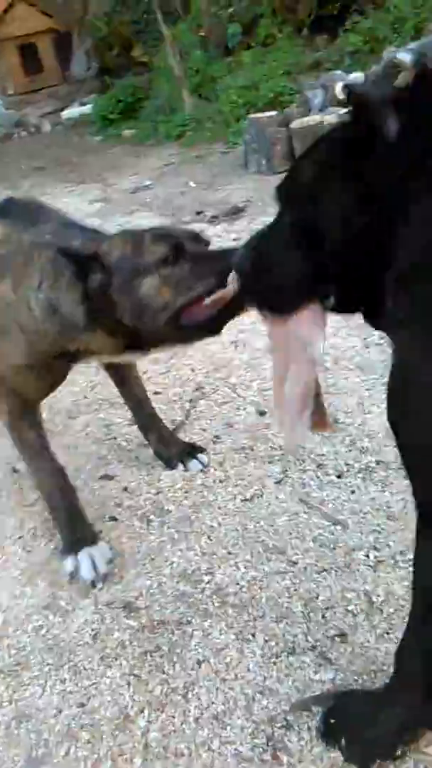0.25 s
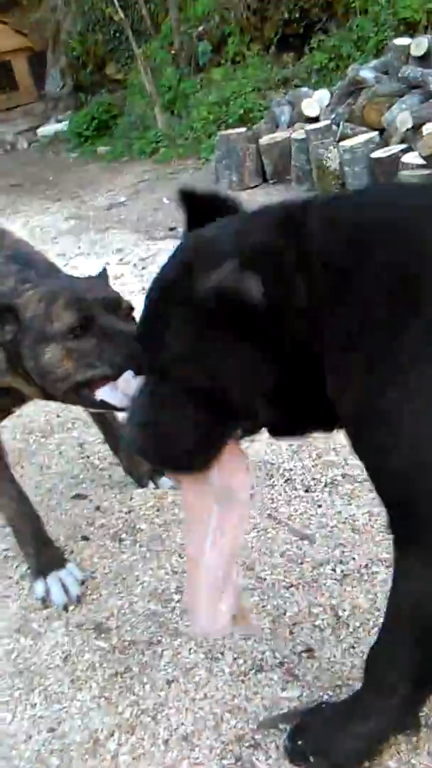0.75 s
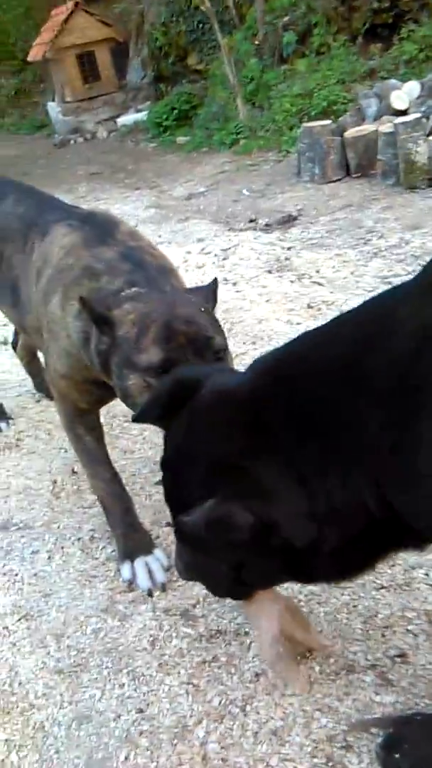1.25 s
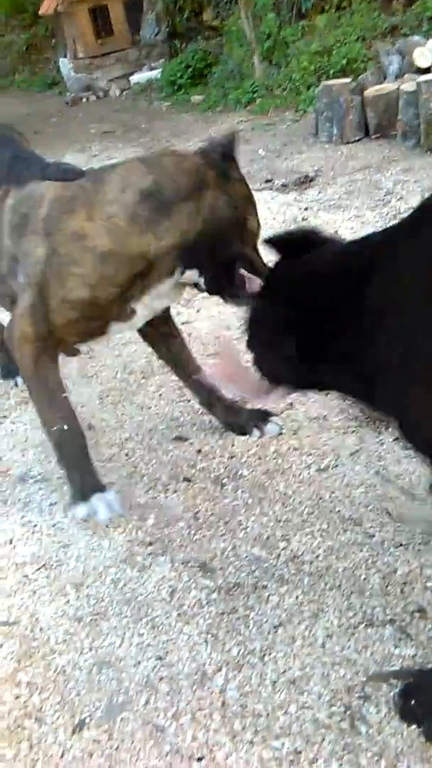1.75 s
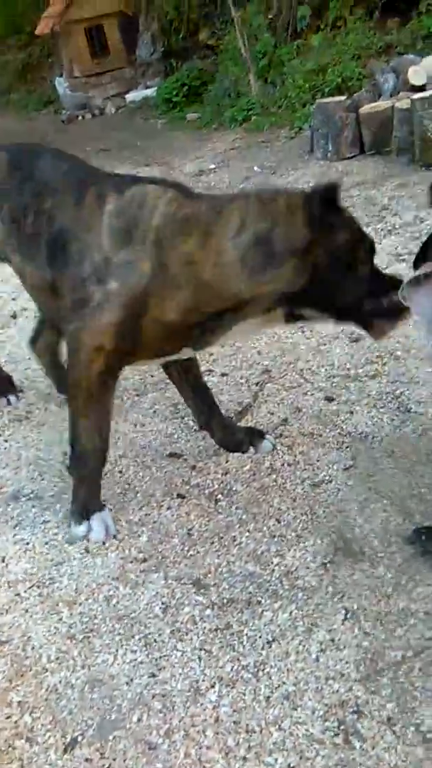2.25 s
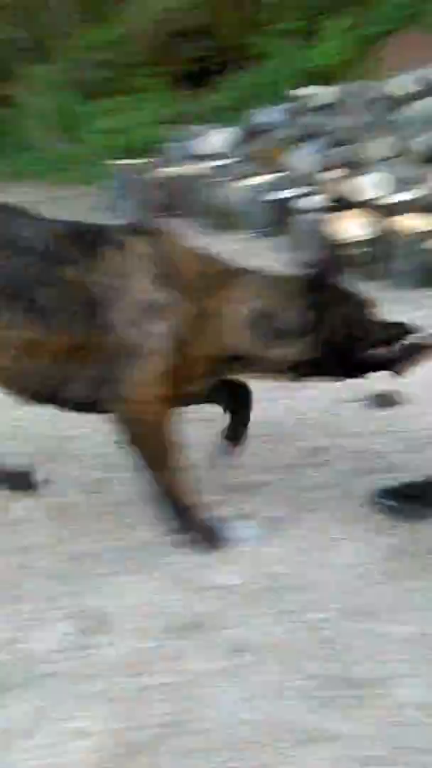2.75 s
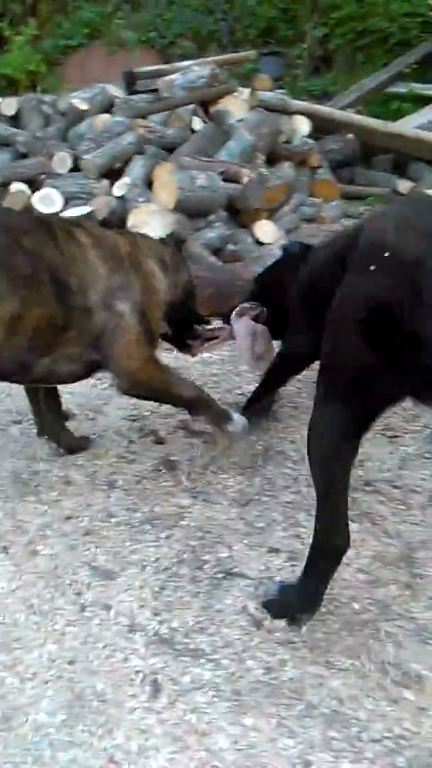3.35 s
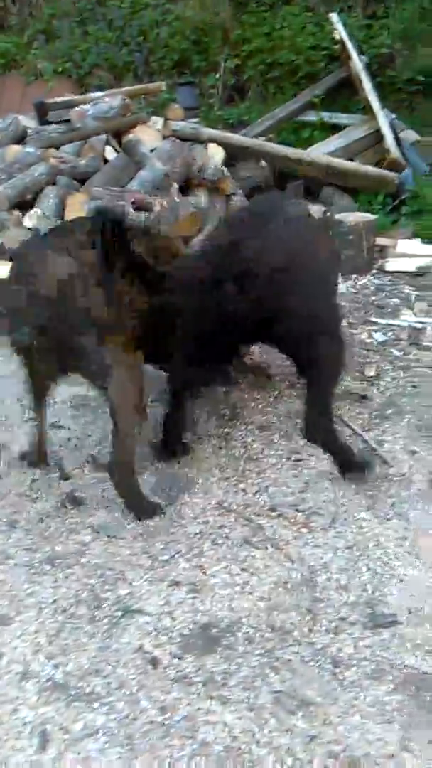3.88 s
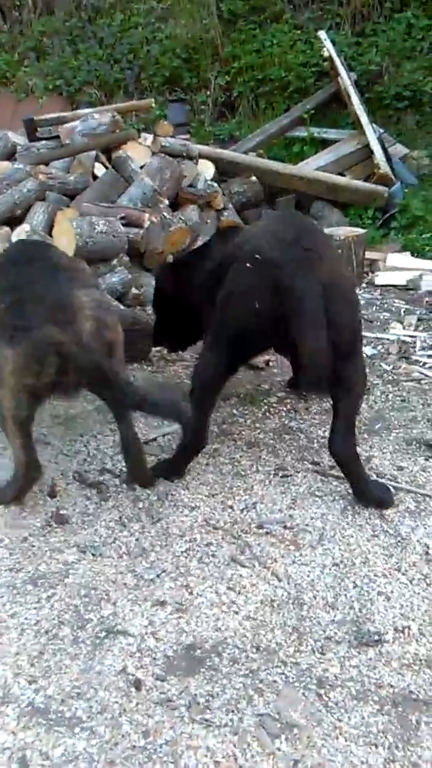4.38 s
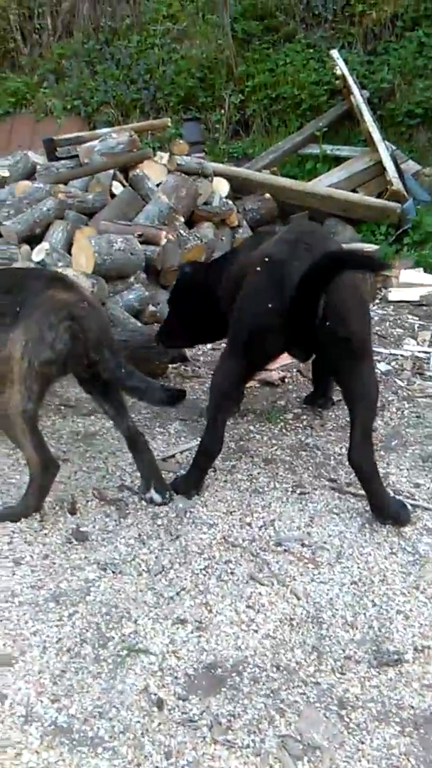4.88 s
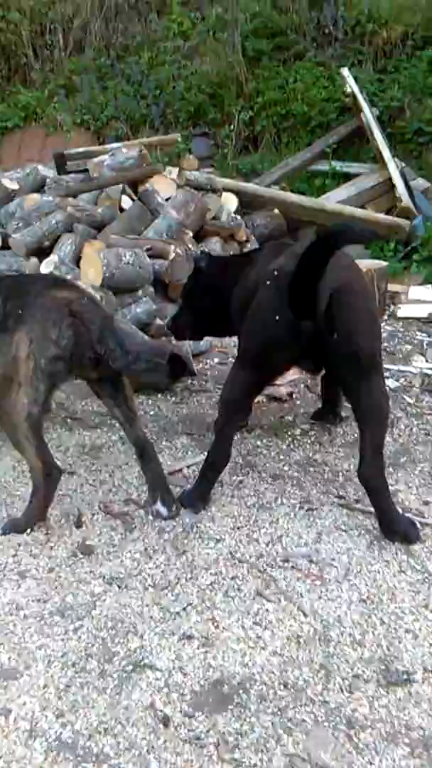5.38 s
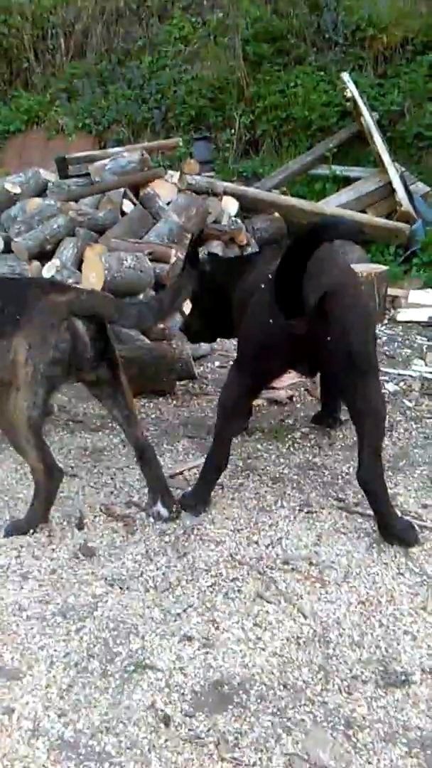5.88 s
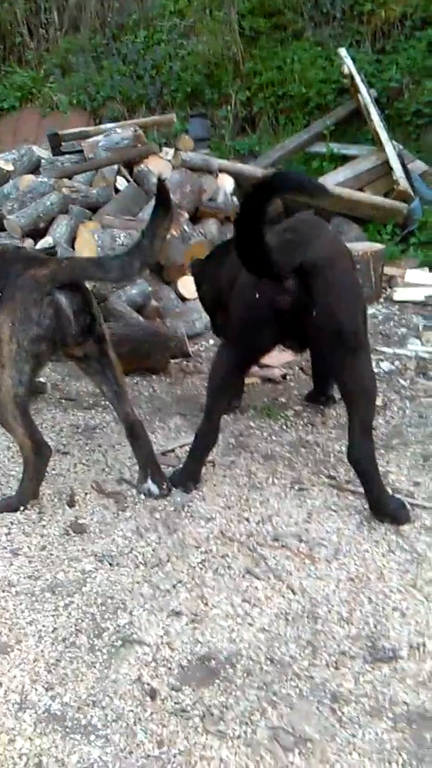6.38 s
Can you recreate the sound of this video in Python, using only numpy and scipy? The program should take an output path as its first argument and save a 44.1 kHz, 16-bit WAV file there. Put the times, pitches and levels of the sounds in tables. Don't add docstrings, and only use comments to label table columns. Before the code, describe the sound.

Outdoors in a gravel yard, close small microphone. Soft distant wash and high cricket chirps come first, with very faint dog hums and light paw scuffs. Stones clack around two seconds, then low chesty growls rumble and burst into rough, open-mouthed snarls with raspy squeaks and gravel scraping. Two short grumbles end it, leaving crickets and quiet air.

```python
import sys
import numpy as np
from scipy import signal
from scipy.fft import rfft, irfft
from scipy.io import wavfile
from scipy.ndimage import uniform_filter1d

SR = 44100
rng = np.random.default_rng(int(sys.argv[2]) if len(sys.argv) > 2 else 0)


def dump(signal):
    limited = np.clip(np.atleast_2d(signal).T, -1, 1)
    pcm = np.round(limited * 32767).astype(np.int16)
    wavfile.write(sys.argv[1], SR, pcm)


def volts_from_db(level):
    exponent = np.asarray(level, float) / 20
    return 10 ** exponent


N = 292262
STRIKE_DB = -2.5


def evened(x):
    return x / np.sqrt(np.mean(x ** 2) + 1e-20)


def add(mix, s, sound):
    part = mix[round(s * SR):][:len(sound)]
    part += sound[:len(part)]


def unroll(rows):
    s, *columns = np.transpose(rows)
    t = np.arange(s[0], s[-1], 1 / SR)
    return s[0], [np.interp(t, s, c) for c in columns]


def filtered(x, order, hz, kind):
    return signal.lfilter(*signal.butter(order, hz, kind, fs=SR), x)


def wander(size, hz):
    noise = rng.standard_normal(size + SR // 4)
    return evened(filtered(noise, 2, hz, "low")[SR // 4:])


def resonate(x, hz, width):
    turn = np.exp(2j * np.pi * np.cumsum(hz * np.ones(len(x))) / SR)
    r = np.exp(-np.pi * width / SR)
    return 2 * (turn * signal.lfilter([(1 - r) ** 2], [1, -2 * r, r * r], x / turn)).real


def coloured(x, points):
    hz, db = np.transpose(points)
    f = np.fft.rfftfreq(N, 1 / SR)
    gain = volts_from_db(np.interp(np.log(f + 1), np.log(hz), db))
    return evened(irfft(rfft(x) * gain, N))


def dogs():
    # t/s, level/dB, jaw opening (0 shut, 1 wide, at times beyond either)
    rumbles = [
        [(2.49, -63, .2), (2.504, -51, 0.43), (2.56, -42, 0), (2.63, -43, 0.32), (2.784, -45.5, 0),
         (2.86, -53.5, 0), (2.88, -44, 0)],
        [(2.88, -48.5, 0.13), (2.894, -51.5, 0.38), (2.946, -43.5, 0.01), (2.982, -43.5, 0.57),
         (3.038, -41, 0.16), (3.1, -40, 0.3), (3.2, -43.5, 0.14), (3.29, -47.5, 0.19), (3.34, -68, 0.7)],
    ]
    snarls = [
        [(3.5, -56, .1), (3.546, -52, -0.65), (3.575, -42.5, 0.57), (3.602, -32.5, 0.75), (3.642, -33, 0.47),
         (3.71, -38.5, 0.7), (3.74, -41.5, 0.65), (3.756, -43.5, 0.68), (3.8, -52, -0.17)],
        [(3.8, -51, 0.197), (3.816, -48.5, 0.69), (3.846, -36.5, 0.43), (3.904, -38.5, 0.63),
         (3.93, -41.5, 0.5), (3.984, -46, 0.65), (4.025, -66, 0.71)],
        [(4.03, -68, 0.21), (4.039, -50, 1), (4.042, -43, 0.99), (4.058, -36, 0.62), (4.08, -38.5, 0.6),
         (4.1, -36.5, 0.72), (4.125, -36, 0.24)],
        [(4.128, -32.5, 0.89), (4.15, -38, 0.98), (4.175, -37, 0.78), (4.23, -36, 0.72), (4.3, -37.5, 0.59),
         (4.314, -39.5, 1.04), (4.392, -42.5, 0.65), (4.415, -53, 0.24), (4.45, -62, 0.01)],
    ]
    grumbles = [
        [(4.46, -47.5, 0.38), (4.5, -47.5, 0.67), (4.512, -51, 0.72), (4.57, -49.5, 0.011), (4.6, -61, 0.39)],
        [(4.64, -49, 0.47), (4.66, -44, 0.0105), (4.7, -51, 0.27), (4.728, -44.5, 0.206), (4.806, -49, 0.2648),
         (4.84, -65, 0.67)],
    ]
    # chest f/Hz, mouth f/Hz at start and end, lip f/Hz at start and end
    tracts = [(150, 705, 690, 3100, 1700), (181, 526, 582, 1450, 2450), (256, 526, 795, 2097, 2068),
              (180, 645, 660, 1950, 2260), (206.6, 730, 657, 2080, 2060), (209, 687, 677, 1906, 2290),
              (198, 550, 450, 2270, 2160), (161, 570, 556, 2100, 2110)]
    bends = [1.01, 0.395, 1.74, 1, 1.8, 1.12, 1.2, 0.91]
    lip_rings = [-37, -21, -33, -29, -25, -21, -32, -23]
    pipe_rings = [-8.5, -7, -0.5, -4.5, -8, -4.5, -11, -9]
    # pulse f/Hz, jitter [0-1], noise share [0-1]
    folds = [(72.8, .16, 0.09), (54, .25, 0.27), (82.86, .15, 0.65), (74, 0.1, 0.38), (74, 0, 0.7),
             (95.95, .3, 0.62), (60.1, 0.4, 0.04), (128.8, .12, 0.08)]
    # flutter f/Hz, depth/dB, start [turns]
    flaps = [(24.6, 1.5, 0.096), (26.07, 4.5, 0.4), (42.5, -5.5, 0.12), (37.3, 0, 0.13), (31.5, 8, 0.1),
             (47.16, 8.5, 0.17), (38.9, 17.5, 0.15), (16.8, 14, 0.99)]
    # gape level/dB, nose level/dB, rasp level/dB over the chest at start and end
    rings = [(-3.5, -5, -35, -27), (-2.5, -6.5, -42, -20), (-3.5, -29, -30, -13.5), (5, -16, -15.5, -20),
             (-1, -7.5, -28, -35), (4.5, -17.5, -11.5, -18), (-1, -11, -18, -6), (11, -8, -8, -17)]
    # t/s, peak level/dB, f/Hz, t60/s
    slaps = [(3.597, -20, 653, 0.044), (3.61, -25, 640, 0.05), (3.625, -24.5, 565, 0.071),
             (3.643, -27.5, 565, 0.058), (3.662, -28, 700, 0.061), (3.715, -32.5, 674, 0.046),
             (3.851, -43, 657, 0.043), (3.883, -32, 581, 0.039), (4.041, -27, 752, 0.045),
             (4.061, -28, 635, 0.064), (4.079, -24.5, 725, 0.05), (4.133, -20, 476, 0.044),
             (4.147, -18.5, 506, 0.05), (4.157, -18, 774, 0.062), (4.207, -30, 781, 0.056),
             (4.239, -26.5, 697, 0.05), (4.262, -31, 700, 0.043), (4.311, -22, 732, 0.043),
             (4.335, -25, 724, 0.042), (4.358, -27, 710, 0.042), (4.373, -35, 715, 0.061)]
    # t/s, peak level/dB, f/Hz, t60/s
    thumps = [
        (2.552, -38, 151, 0.04),
        (2.936, -34, 102.6, 0.043),
        (3.127, -40, 164, 0.036),
        (3.205, -35, 190, 0.04),
        (3.716, -28.5, 220, 0.04),
        (3.843, -32, 134, 0.04),
    ]
    # t/s,
    # length/s, peak level/dB, f/Hz
    squeaks = [(2.992, 0.021, -54, 1900), (3.154, 0.028, -53.5, 2170), (3.571, 0.047, -43.5, 710),
               (3.96, 0.042, -48.5, 900), (4.146, 0.024, -49, 450), (4.069, .025, -52, 3614),
               (4.087, .016, -55, 2100), (4.093, 0.013, -59, 3620), (4.135, 0.019, -44.5, 2060),
               (4.16, 0.06, -51, 2620), (4.162, 0.048, -46, 1946), (4.165, 0.052, -46.5, 3510),
               (4.166, .035, -49, 4290), (4.197, 0.028, -38.5, 2015), (4.226, 0.025, -39.5, 2570),
               (4.225, 0.025, -53, 1900), (4.272, 0.019, -42, 2770), (4.32, 0.019, -46, 2700),
               (4.344, 0.041, -48, 3450), (4.363, 0.067, -50, 2250), (4.373, 0.036, -51, 2740),
               (4.165, .13, -38.5, 415), (4.05, 0.067, -44, 470), (4.373, 0.048, -52, 1060),
               (4.19, 0.048, -46, 1120)]
    # t/s, length/s, peak level/dB, f/Hz
    hums = [
        (0.034, 0.17, -63.5, 750),
        (0.315, 0.19, -65.5, 684),
        (0.596, 0.17, -61, 695),
        (1.608, 0.087, -63, 867),
    ]
    mix = np.zeros(N)
    for row in zip(rumbles + snarls + grumbles, tracts, bends, lip_rings, pipe_rings, folds, flaps, rings):
        add(mix, *growl(*row))
    for s, peak_db, *ring in slaps + thumps:
        add(mix, s, thud(peak_db + STRIKE_DB, *ring))
    for row in squeaks:
        add(mix, *squeak(*row))
    for row in hums:
        add(mix, *hum(*row))
    return mix


def growl(rows, tract, bend, lip_db, pipe_db, folds, flaps, rings):
    # multiple of chest Hz, width/Hz, level/dB
    chest_modes = [(.58, 82, -2.5), (1.01, 120, -2), (1.42, 115.3, -6.5)]
    # multiple of mouth Hz, width/Hz, level/dB
    mouth_modes = [(1.023, 120, 0.1)]
    # multiple of mouth Hz, width/Hz, level/dB
    gape_modes = [(.62, 150, 5), (.81, 88, 6), (1.11, 90, 7.5)]
    # f/Hz, width/Hz, level/dB
    nose_modes = [(965, 130, 3.5), (1110, 310, 3), (1240, 36, 6)]
    # multiple of lip Hz, width/Hz, level/dB
    rasp_modes = [(.8, 350, -5.5), (1.005, 250, 4), (1.27, 316, 3.5), (1.67, 497, -1.5), (2.03, 453, 0.5)]
    edge_db = -13.5
    fold_hz, jitter, noise_share = folds
    flutter_hz, flutter_db, flutter_start = flaps
    gape_db, nose_db, *rasp_ends_db = rings

    s, (chest_db, jaw) = unroll(rows)
    size = len(chest_db)
    mouth_db, rasp_db, chest_hz, mouth_hz, lip_hz = throat(chest_db, jaw, tract, bend, *rasp_ends_db)

    turns = np.cumsum(fold_hz * np.exp(jitter * wander(size, 44.95))) / SR
    hard, bump = snaps(s, size)
    pulses = np.diff(np.floor(turns), prepend=0) * volts_from_db(9 * jitter * wander(size, 60))
    slaps = evened(hard + pulses)
    puffs = evened((0.63 + np.exp(-(turns % 1) / 0.5)) * rng.standard_normal(size))
    flap_turns = flutter_start + np.cumsum(flutter_hz * np.exp(0.023 * wander(size, 5.7))) / SR
    flutter = uniform_filter1d(volts_from_db(-flutter_db * (flap_turns % 1)), size=200) * bump
    voiced = flutter * (np.sqrt(1 - noise_share) * slaps + np.sqrt(noise_share) * puffs)

    chest = cavity(voiced, chest_hz, chest_modes, 2.05)
    mouth = cavity(voiced, mouth_hz, mouth_modes, 1.3)
    mouth = mouth + volts_from_db(gape_db) * cavity(voiced, mouth_hz, gape_modes, 4.6)
    mouth = mouth + volts_from_db(edge_db) * evened(filtered(voiced, 2, [300, 1250], "band"))
    mouth = evened(mouth) + volts_from_db(nose_db) * cavity(voiced, 1, nose_modes, 2.4)
    rasp = cavity(flutter * (.45 * slaps + puffs), lip_hz, rasp_modes, 4.5)
    lips = evened(resonate(voiced, lip_hz, 116))
    pipe = evened(resonate(voiced, 1.052 * chest_hz, 38.0))
    sound = chest + volts_from_db(mouth_db) * mouth + volts_from_db(rasp_db) * rasp + volts_from_db(lip_db) * lips + volts_from_db(pipe_db) * pipe
    sound = filtered(sound, 2, 62, "high")
    return s, volts_from_db(chest_db) * sound * signal.windows.tukey(size, .05)


def throat(effort_db, jaw, tract, bend, rasp_from_db, rasp_to_db):
    shut_db, open_db = -21, 29
    chest_sag, rasp_lag = 0.012, 0.42
    rasp_build_s = 0.033
    chest_hz, mouth_from, mouth_to, lip_from, lip_to = tract
    size = len(jaw)
    slack = effort_db.max() - effort_db
    along = np.linspace(0, 1, size) ** bend
    late_db = 20 * np.maximum(1 - np.arange(size) / SR / rasp_build_s, 0)
    mouth_db = shut_db + open_db * jaw
    rasp_db = rasp_from_db + (rasp_to_db - rasp_from_db) * along + rasp_lag * slack - late_db
    mouth_hz = mouth_from + (mouth_to - mouth_from) * along
    lip_hz = lip_from + (lip_to - lip_from) * along
    return mouth_db, rasp_db, chest_hz * np.exp(-chest_sag * slack), mouth_hz, lip_hz


def snaps(s, size):
    # t/s, boost level/dB; above 0 a slap and a bump, below 0 only a short dip
    hard_flaps = [(2.551, -6), (2.62, 2), (2.715, -3), (2.937, 2), (2.975, 0), (3.009, 8), (3.041, 9),
                  (3.084, 7.5), (3.127, 13), (3.165, 15), (3.206, 16), (3.245, 10), (3.28, 3),
                  (3.597, -0.5), (3.716, 3), (3.85, 3.5), (3.884, 7), (4.042, 7.5), (4.134, -0.5),
                  (4.311, 2), (4.335, 5.5), (4.36, 7.5)]
    hits = np.zeros(N)
    for at, boost_db in hard_flaps:
        hits[round(at * SR)] = volts_from_db(boost_db) - 1
    hits = hits[round(s * SR):][:size]
    decay = np.exp(-1 / (0.016 * SR))
    return hits > 0, 1 + signal.lfilter([1], [1, -decay], hits)


def cavity(x, hz, modes, restless):
    rings = 0
    for k, (multiple, width, db) in enumerate(modes):
        drift = 1 + restless / 150 * wander(len(x), 7.0)
        swell_db = restless * wander(len(x), 10.0)
        rings = rings + (-1) ** k * volts_from_db(db + swell_db) * resonate(x, multiple * hz * drift, width)
    held = uniform_filter1d(uniform_filter1d(rings ** 2, size=2200), size=2200)
    return rings / np.sqrt(held + 1e-20)


def squeak(s, length, peak_db, hz):
    size = round(length * SR)
    t = np.arange(size) / SR
    ruffle = 1 + 0.29 * np.cos(2 * np.pi * 130 * t)
    breath = evened(resonate(rng.standard_normal(SR // 4)[:size], hz, 380))
    tone = np.sin(2 * np.pi * hz * t) + breath
    return s, volts_from_db(peak_db) * evened(tone * ruffle) * signal.windows.tukey(size, .7)


def hum(s, length, peak_db, hz):
    size = round(length * SR)
    tone = evened(resonate(rng.standard_normal(SR)[:size], hz, 87))
    return s, volts_from_db(peak_db) * tone * signal.windows.tukey(size, .8)


def paws():
    # t/s, peak level/dB, f/Hz
    stones = [(1.8078, -48, 7920), (2.046, -43, 7330), (2.119, -41, 6900), (2.159, -37, 6340),
              (2.1644, -39, 9500), (2.166, -37, 6140), (2.7152, -46, 7180), (2.831, -43, 6980),
              (3.362, -41.5, 7750), (3.4196, -37, 7420), (3.4554, -46, 7300), (3.5678, -41, 7700),
              (3.8435, -35, 6800), (3.916, -39, 7430), (4.104, -34, 7400), (4.325, -38, 6700),
              (4.351, -35.5, 7450), (4.562, -45, 5600), (6.331, -43, 6230), (6.4453, -43.5, 8400)]
    # t/s, peak level/dB, f/Hz, t60/s
    landings = [
        (2.019, -50, 129, 0.047),
        (2.052, -43.5, 150, 0.033),
        (2.091, -45.5, 130, 0.03),
        (2.34, -48, 139, 0.04653),
        (4.464, -39.5, 275, 0.042),
        (4.494, -41, 132, 0.066),
    ]
    # t/s, peak level/dB, f/Hz, t60/s
    knocks = [(2.013, -47, 885, 0.035), (2.087, -48, 930, .04), (2.092, -37.5, 820, 0.026),
              (2.123, -50, 4500, .04), (2.093, -45, 1660, 0.037), (2.093, -47, 2720, .02),
              (1.7, -53, 2300, 0.013), (2.4, -53, 1600, 0.018), (2.044, -46, 3300, .015),
              (2.105, -45, 740, 0.04), (4.493, -31, 2260, 0.023), (4.495, -36.5, 2700, 0.027),
              (4.494, -42, 1120, 0.042), (4.494, -48, 4865, 0.0455)]
    # t/s, peak level/dB, f/Hz, t60/s
    pebble_ticks = [(1.8086, -51, 8240, 0.012), (2.0246, -52, 8290, 0.012), (2.0381, -45, 8160, 0.012),
                    (2.0899, -46, 8340, 0.012), (2.1648, -44, 9680, 0.011), (2.8303, -48, 8260, 0.012),
                    (3.3611, -45, 8030, 0.012), (3.4204, -43, 8360, 0.012), (3.4543, -45, 9300, 0.012),
                    (3.5641, -49, 8080, 0.012), (3.8432, -34, 10000, 0.01), (4.042, -48, 8300, 0.013),
                    (4.105, -37, 9080, 0.012), (4.1298, -45, 8260, 0.012), (4.3443, -43, 8140, 0.012),
                    (4.5603, -51, 8430, 0.012)]
    mix = gravel()
    for s, *stone in stones:
        add(mix, s - .01, clack(*stone))
    for s, *blow in landings + knocks:
        add(mix, s, thud(*blow))
    for s, peak_db, *ring in pebble_ticks:
        add(mix, s, thud(peak_db + STRIKE_DB, *ring))
    return mix


def gravel():
    # f/Hz, level/dB
    grit_colour = [(3500, -30), (4400, -8), (5400, -12), (6200, -3), (7500, 0.1), (10000, -7), (12000, -17),
                   (15800, -33)]
    # f/Hz, level/dB per Hz
    body_colour = [(900, -2), (1300, -3), (2000, -2.5), (3000, -3.5), (4000, -2.5), (5200, -14.5),
                   (10000, -17), (14500, -26)]
    grit_gain, body_gain = pushes()
    sizes = volts_from_db(1.8 * np.minimum(rng.exponential(1, N), 4))
    grains = sizes * (rng.random(N) < 7000 / SR) * rng.standard_normal(N)
    pebbles = np.zeros(N)
    for hz in np.geomspace(6000, 11000, num=7):
        ticks = rng.standard_normal(N) * (rng.random(N) < 45 / SR)
        band = signal.butter(2, [hz - 150, hz + 150], "band", fs=SR, output="sos")
        pebbles += signal.sosfilt(band, ticks)
    grit = coloured(grains, grit_colour) + 0.29 * evened(pebbles)
    body = coloured(grains[::-1], body_colour)
    clumps = volts_from_db(2.37 * wander(N, 27))
    return clumps * (grit_gain * grit + body_gain * body)


def pushes():
    # t/s of hardest push, grit level/dB, time to fade 20 dB/s, body level/dB over the grit
    scuffs = [(.075, -65, .1, 3), (.12, -64, .2, 4), (.17, -65, .15, 3), (1.25, -72, 0.02, -3.5),
              (1.55, -69, 0.35, 1.5), (1.83, -56.5, .05, 1.5), (2.02, -58, .03, 4), (2.034, -55, .04, 1.5),
              (2.046, -52, .02, 0.5), (2.1, -55, .04, 1.5), (2.112, -51.5, 0.0453, -0.5),
              (2.166, -48.5, 0.0081, -17), (2.215, -58, .17, -4), (2.46, -67, 0.3, 6),
              (2.6, -63.5, 0.46, 2.5), (2.86, -57.5, 0.0362, -1.5), (2.97, -65.5, 0.32, 8),
              (3.25, -61.5, .5, 1), (3.44, -53, .15, -2.5), (3.57, -59.5, 0.46, 4.5),
              (3.85, -53.5, 0.08, -9), (3.93, -57.5, 0.2443, 6.5), (4.06, -54.5, 0.08, -4.5),
              (4.1, -51.5, 0.0839, 6.5), (4.19, -52, 0.2251, 3.5), (4.35, -53.5, 0.11, -0.5),
              (4.56, -59.5, 0.08, 4), (6.24, -63, .05, -6)]
    bed_db, bed_body_db = -73.5, -68
    push_share = 0.7
    t = np.arange(0, N / SR + .01, .002)
    s, peak_db, fade, body_db = np.transpose(scuffs)[:, :, None]
    away = np.where(t < s, (s - t) / push_share, t - s)
    level_db = peak_db - 20 * away / fade
    grit = np.sqrt(volts_from_db(2 * bed_db) + volts_from_db(2 * level_db).sum(0))
    body = np.sqrt(volts_from_db(2 * bed_body_db) + volts_from_db(2 * (level_db + body_db)).sum(0))
    return [np.interp(np.arange(N) / SR, t, gain) for gain in (grit, body)]


def clack(peak_db, hz):
    build_s, slip_s = .0028, .0018
    t = np.arange(2600) / SR - .01
    noise = rng.standard_normal(2600)
    burst = evened(filtered(noise, 3, [5700, 10500], "band"))
    ring = evened(resonate(noise, hz, 600))
    shape = np.where(t < .002, np.exp((t - .002) / build_s), np.exp(-(t - .002) / slip_s))
    return volts_from_db(peak_db - 12.5) * (burst + 1.16 * ring) * shape


def thud(peak_db, hz, t60):
    t = np.arange(2800) / SR
    crunch = evened(resonate(rng.standard_normal(len(t)), hz, 0.21 * hz))
    knock = np.sin(2 * np.pi * hz * t) + 0.48 * crunch
    return 1.09 * volts_from_db(peak_db - 60 * t / t60) * knock * np.minimum(t / 0.0014, 1)


def yard(x):
    t = np.arange(SR // 4) / SR
    echoes = rng.standard_normal(len(t)) * (rng.random(len(t)) < .05)
    scatter = echoes * (t > .008) * volts_from_db(-60 * t / 0.22)
    return x + volts_from_db(-10.0) * signal.fftconvolve(x, scatter / np.linalg.norm(scatter))[:N]


def crickets():
    # t/s, length/s, peak level/dB, wing f/Hz
    chirps = [(0.056, 0.13, -48.5, 4364), (1.234, 0.15, -51.5, 4400), (2.306, 0.13, -50.5, 4390),
              (3.553, 0.2, -56.5, 4370), (4.688, 0.17, -56, 4370), (4.87, 0.21, -65, 4390),
              (3.883, 0.148, -63, 4330), (5.628, 0.021, -55, 4320), (5.668, 0.12, -52.5, 4330),
              (1.869, 0.16, -65, 4080), (2.878, 0.16, -79, 4008), (4.412, 0.081, -59, 4110),
              (4.598, 0.049, -61, 4640)]
    mix = np.zeros(N)
    for row in chirps:
        add(mix, *cricket(*row))
    return mix


def cricket(s, length, peak_db, hz):
    swell_db, swell_share = -7, 0.39
    linger_db, linger_s = -11.5, 0.115
    dip_hz, lift_hz = -30.5, 45.6
    blur_share, far_db = .12, -56
    s, (level_db,) = unroll([(s - .02, peak_db + 2 * swell_db),
                             (s, peak_db + swell_db),
                             (s + swell_share * length, peak_db),
                             (s + 0.74 * length, peak_db),
                             (s + 1.14 * length, peak_db + linger_db),
                             (s + 1.24 * length + linger_s, peak_db + linger_db - 13)])
    size = len(level_db)
    strokes = 1 + 0.33 * np.cos(2 * np.pi * (40 * np.arange(size) / SR + rng.random()))
    glide = np.interp(np.arange(size) / size, [0, .25, .55], [25, dip_hz, lift_hz])
    pitch = hz + glide + 9 * wander(size, 14)
    waver = volts_from_db(wander(size, 21))
    tone = evened(strokes * np.sin(2 * np.pi * np.cumsum(pitch) / SR) * waver)
    blur = evened(resonate(rng.standard_normal(size), hz, 140))
    chirp = evened(tone + blur_share * (1 + volts_from_db(far_db - peak_db)) * blur)
    return s, volts_from_db(level_db) * chirp * signal.windows.tukey(size, .15)


def wash():
    # f/Hz, level/dB per Hz
    far_colour = [(30, -7.5), (130, 0.5), (361, -8.5), (1300, -9.5), (2140, -6), (4100, -10.5), (5200, -16),
                  (7000, -14.5), (8500, -18), (11000, -26.5), (15700, -34)]
    wash_db = -55.5
    lull_s, lull_hz, lull_db = 6.16, 2420, -5
    hz, t, z = signal.stft(coloured(rng.standard_normal(N), far_colour), SR, nperseg=1024, noverlap=768)
    patches = uniform_filter1d(rng.standard_normal(z.shape), 14, 0)
    patches = evened(uniform_filter1d(patches, 16, 1))
    lull_band = np.exp(-(np.log((hz[:, None] + 1) / lull_hz) / 0.27) ** 2)
    lull = lull_band * np.clip((t - lull_s) / .1, 0, 1)
    z = z * volts_from_db(0.97 * patches + lull_db * lull)
    patchy = signal.istft(z, SR, nperseg=1024, noverlap=768)[1][:N]
    return volts_from_db(wash_db + 0.11 * wander(N, 13.0)) * evened(patchy)


def scene():
    near = dogs() + paws()
    return np.tile(yard(near) + crickets() + wash(), (2, 1))


def top_cut(x):
    return signal.sosfilt(signal.butter(12, 15830, fs=SR, output="sos"), x)


def record(dry):
    bass_cut = signal.butter(4, 58, "high", fs=SR, output="sos")
    mix = signal.sosfilt(bass_cut, dry)
    return top_cut(mix)


dry = scene()
out = record(dry)
dump(out)
```